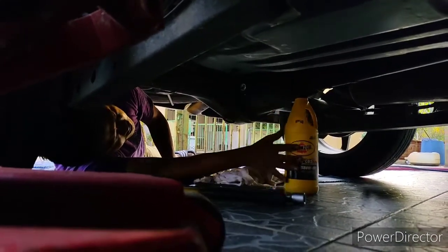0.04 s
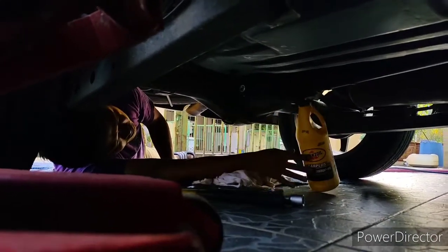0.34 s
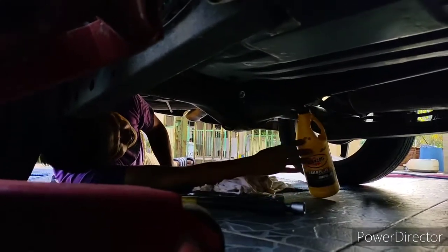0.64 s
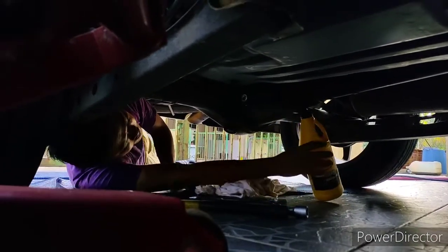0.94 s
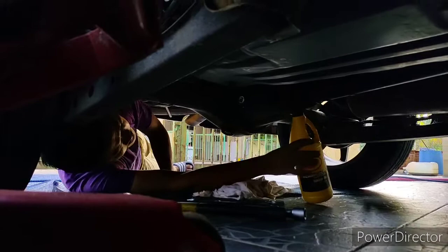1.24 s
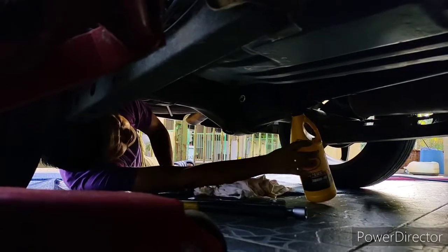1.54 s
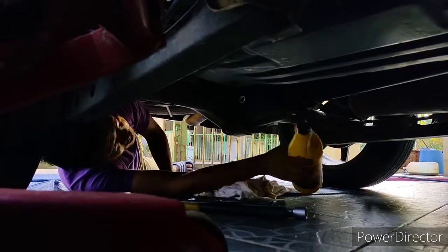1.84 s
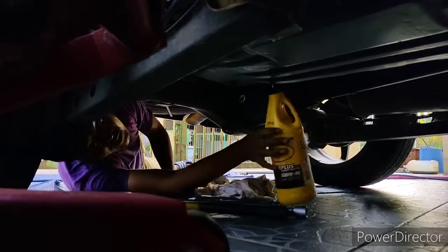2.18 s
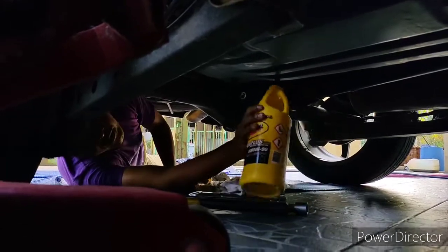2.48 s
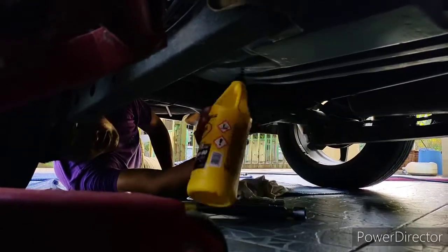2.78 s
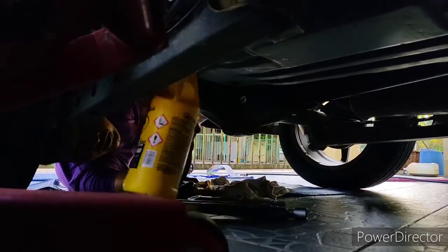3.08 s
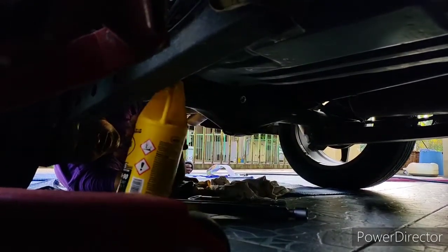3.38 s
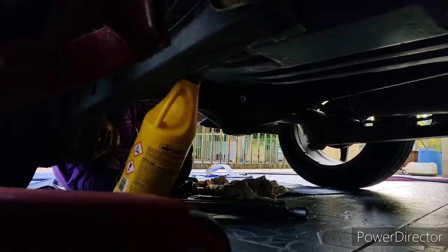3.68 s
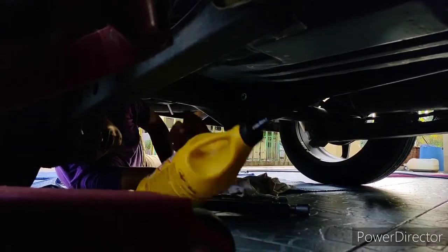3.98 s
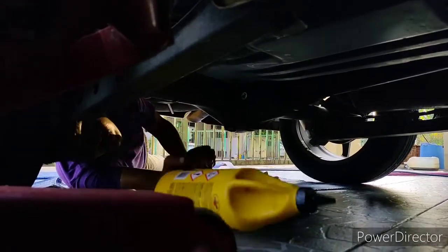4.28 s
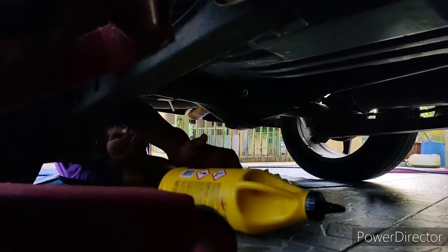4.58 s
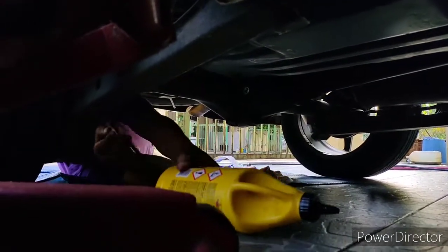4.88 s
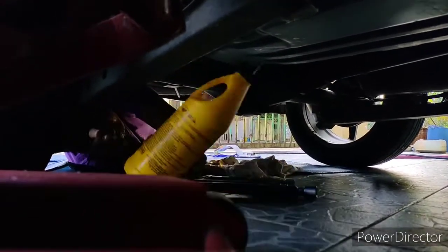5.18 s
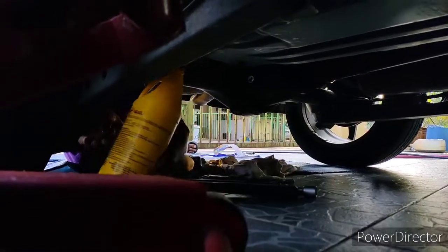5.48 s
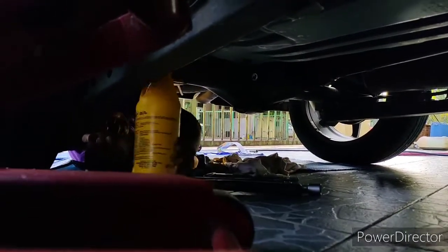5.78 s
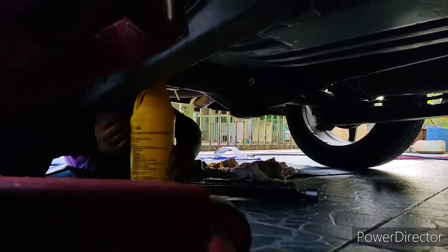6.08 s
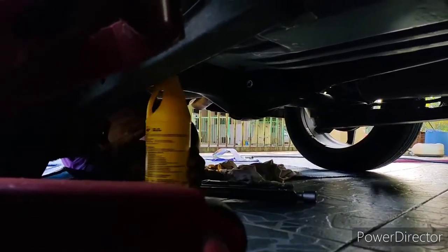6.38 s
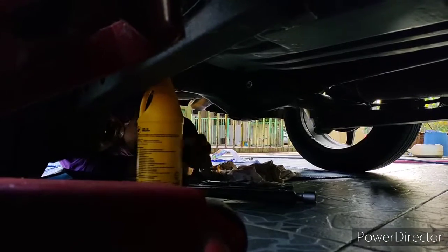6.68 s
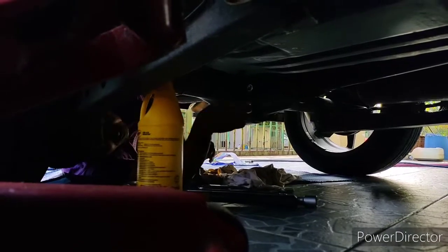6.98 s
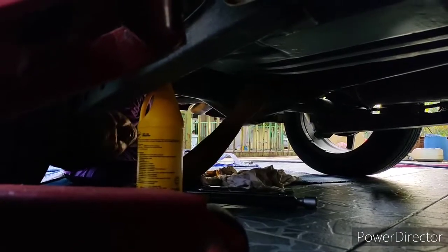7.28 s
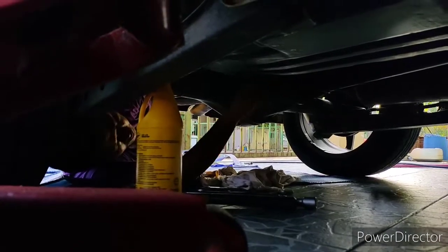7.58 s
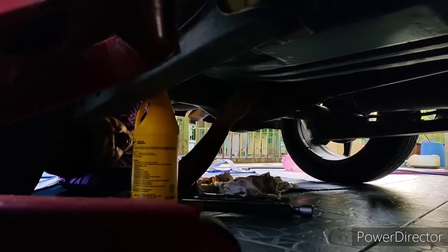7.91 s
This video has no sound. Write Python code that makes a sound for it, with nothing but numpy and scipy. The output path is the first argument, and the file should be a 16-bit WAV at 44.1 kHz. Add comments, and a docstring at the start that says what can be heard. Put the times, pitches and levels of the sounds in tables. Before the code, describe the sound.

Close to the floor of an open-sided garage, a bright tool clink is followed by irregular hollow knocks and scrapes of an empty plastic bottle on tiles. Several bumps against a car's underside give low booms, and a faint distant bird starts chirping. The bottle falls over with a clack and quickening bounces, is set upright firmly and slid along. Soft outdoor hiss and distant rumble continue underneath.

```python
"""Over quiet outdoor air, a steel tool clinks on a tiled garage floor. An empty plastic oil bottle knocks
and scrapes on the tiles, its thin walls ringing, ticking and squeaking as it is handled. It bumps a car's
underbody: the panel booms and a loose metal part rings, while a small bird starts to chirp far off.
The bottle topples, bounces to rest on its side, then is stood up and pushed into place."""
import sys
import numpy as np
from scipy import signal
from scipy.fft import rfft, irfft
from scipy.io import wavfile
from scipy.ndimage import uniform_filter1d

SR = 44100
rng = np.random.default_rng(int(sys.argv[2]) if len(sys.argv) > 2 else 0)


def wrap_up_sound(samples):
    """Save the sound to the file named by the first command line argument, as 16-bit audio."""
    columns = np.atleast_2d(samples).T
    # keep every value between -1 and 1, then stretch to whole-number steps
    tamed = np.clip(columns, -1, 1)
    steps = np.round(tamed * 32767).astype(np.int16)
    wavfile.write(sys.argv[1], SR, steps)


N = 354822


def amp(db):
    """Decibels to gain."""
    return 10 ** (np.asarray(db) / 20)


def rms(x):
    """Root mean square."""
    return np.sqrt(np.mean(x ** 2) + 1e-20)


def curve_at(points, hz):
    """Reads a curve on a log-frequency axis."""
    points_hz, values = np.transpose(points)
    return np.interp(np.log(hz + 1), np.log(points_hz), values)


def add(mix, start, sound):
    """Mixes a sound in at a start time in seconds."""
    part = mix[max(round(start * SR), 0):][:len(sound)]
    part += sound[:len(part)]


def band(x, lo_hz, hi_hz, order=3):
    """Causal band-pass."""
    edges_hz = [lo_hz, min(hi_hz, SR / 2 - 100)]
    return signal.sosfilt(signal.butter(order, edges_hz, "band", fs=SR, output="sos"), x)


def equalise(x, points, size=4096):
    """Minimum-phase EQ through the given (Hz, dB) points."""
    log_gain = np.log(amp(curve_at(points, abs(np.fft.fftfreq(size, 1 / SR)))))
    taps = np.fft.ifft(np.exp(np.conj(signal.hilbert(log_gain)))).real[:size // 2]
    return signal.fftconvolve(x, taps)[:len(x)]


def balance(x, bands, levels_db, seconds):
    """EQs a sound so that its opening seconds come near the given level in each band."""
    gains = [(np.sqrt(lo * hi), db - 20 * np.log10(rms(band(x, lo, hi)[:int(seconds * SR)])))
             for (lo, hi), db in zip(bands, levels_db)]
    return equalise(x, gains)


def dying_noise(count, t60_curve, ring, size=128):
    """Noise whose bands each die at their own speed; ring scales the decay times."""
    hz, t, spectrum = signal.stft(rng.standard_normal(count), SR, nperseg=size)
    t60 = ring * curve_at(t60_curve, hz)[:, None]
    return signal.istft(spectrum * amp(-60 * t / t60), SR, nperseg=size)[1][:count]


def ringing(modes, t, pitch=1, ring=1):
    """Damped sines; each mode starts up or down, by where the blow lands."""
    return sum(rng.choice([-1, 1]) * amp(db - 60 * t / (t60 * ring)) * np.sin(2 * np.pi * hz * pitch * t)
               for hz, db, t60 in modes)


# The tone of the outdoor bed. Each row: frequency in Hz, relative level in dB.
AIR_EQ = [(15, -46), (25, -22.5), (64, 3), (102, -5), (236, -11), (270, -13), (489, -11.5), (575, -16),
          (754, -17), (911, -22.5), (1020, -22.5), (1610, -26.5), (4250, -32), (14800, -48.5), (16000, -45)]
# Two swells of distant rumble. Each row: centre in seconds, half width in seconds, rise in dB.
RUMBLE_SWELLS = [(2.0, 0.56, 5.5), (5.2, 0.3, 10)]


def air(level_db=-51, calm_db=-2, patchy_db=1.66, rumble_hz=130, size=1024):
    """Outdoor hiss drifting in soft patches, over a slowly swelling rumble."""
    frames = dict(fs=SR, nperseg=size, noverlap=size * 3 // 4)
    hz, t, spectrum = signal.stft(rng.standard_normal(N), **frames)
    patches = uniform_filter1d(rng.standard_normal(spectrum.shape), size=10, axis=0)
    patches = uniform_filter1d(patches, size=20, axis=1)
    rumble_db = calm_db + sum(db * np.exp(-((t - centre) / width) ** 2)
                              for centre, width, db in RUMBLE_SWELLS)
    shelf_db = rumble_db / (1 + (hz[:, None] / rumble_hz) ** 4)
    drift = signal.istft(spectrum * amp(patchy_db * patches / rms(patches) + shelf_db), **frames)[1][:N]
    sound = irfft(rfft(drift) * amp(curve_at(AIR_EQ, np.fft.rfftfreq(N, 1 / SR))), N)
    return amp(level_db) * sound / rms(sound)


# The tool's bright ring. Each row: frequency in Hz, level in dB, T60 in seconds before the ring factor.
STEEL_MODES = [(2966, -45, .22), (3333, -38, .1), (3467, -29, .165), (5115, -31, .11), (5165, -37, .14),
               (5539, -51, .22), (6794, -31, .13), (6870, -41, .08), (7461, -29, .12), (7530, -39, .08),
               (8335, -36, .1), (8403, -38, .13), (9318, -41, .13), (9975, -39, .09), (12230, -48, .24),
               (12540, -55, .22), (12890, -50, .26), (13160, -47, .22)]


def clink(ring=1.07, rattle_db=-41, rattle_s=.14):
    """The steel tool rings with beating pairs of modes over a faint rattle on the tile."""
    t = np.arange(SR // 2) / SR
    rattle = band(rng.standard_normal(len(t)), 540, 7000, order=2) * np.exp(-t / rattle_s)
    return ringing(STEEL_MODES, t, ring=ring) + amp(rattle_db) * rattle


# The colour of the bottle's crowd of wall modes. Each row: frequency in Hz, gain in dB.
WALL_EQ = [(100, -29), (300, 2.5), (550, -2.5), (850, 3), (1350, 0), (2000, 4), (3000, 3.5), (4100, 1),
           (4800, -8.5), (7000, -10), (10000, -19), (13000, -22.5), (16000, -44)]
# Their decay. Each row: frequency in Hz, T60 in seconds before the ring factor.
WALL_DECAY = [(200, 0.21), (1000, 0.096), (3500, 0.09), (6000, 0.11), (14000, 0.02)]
# A hit's four bands: hollow, knock, crack, snap. Each row: low edge in Hz, high edge in Hz.
HIT_BANDS = [(130, 500), (500, 1400), (1400, 4500), (4500, 15000)]


def hit(modes, levels_db, pitch, ring, spot_hz, spot_db, wall_db, click_db, crack_db):
    """One blow: a contact click, a short crack, the crowd of wall modes and the main resonances."""
    crack_s, swell_s, spot_t60, scatter = .0033, .00081, .049, .0315
    t = np.arange(SR // 2) / SR
    wall = dying_noise(len(t), WALL_DECAY, ring) * (1 + amp(crack_db) * np.exp(-t / crack_s))
    wall[0] += amp(click_db)
    # where the wall is hit and held shifts its higher modes a little
    shifted = [(hz * (1 + scatter * rng.standard_normal() * np.clip(hz / 1200 - 1, 0, 1)), db, t60)
               for hz, db, t60 in modes]
    body = ringing(shifted, t, pitch, ring)
    body += ringing([(spot_hz, spot_db, spot_t60)], t)  # the struck spot favours one mode
    body *= 1 - np.exp(-t / swell_s)  # the whole shell takes a moment to move
    return balance(body + amp(wall_db) * equalise(wall, WALL_EQ), HIT_BANDS, levels_db, seconds=.025)


def contact_levels(level_db, hardness, tone_db, soft_hz=814):
    """Band levels of a hit: a softer contact lasts longer and so loses its treble."""
    centres_hz = np.sqrt(np.prod(HIT_BANDS, axis=1))
    cutoff_hz = soft_hz * 2 ** hardness
    return level_db + np.array(tone_db) - 10 * np.log10(1 + (centres_hz / cutoff_hz) ** 4)


# The bottle's voice, struck on its base, before each knock's pitch and ring factors.
# Each row: frequency in Hz, relative level in dB, T60 in seconds.
BOTTLE_BASE_MODES = [(112.4, -8, 0.1), (204.7, -6, 0.13), (255, 3.5, 0.064), (425, -9, .1),
                     (563.4, -13.5, 0.086), (737, -14.5, 0.087), (781, -16, 0.13), (1108, -17.5, 0.12),
                     (1547, -18.5, 0.15), (1930, -10, 0.11), (2450, -16, 0.023), (2658, -8.5, 0.085),
                     (3100, -38, 0.14), (3530, -14, 0.13), (3870, -10, 0.1)]
# A perfectly hard knock: hollow, knock, crack and snap offsets in dB.
HARD_KNOCK_TONE = (-0.14, -2.16, -1.5, -0.91)
# Base and corners on the tiles. Each row: start in seconds, level in dB before tone shaping,
# hardness in octaves, pitch factor, struck spot's mode in Hz, its relative level in dB.
TILE_KNOCKS = [(.03, -36.5, 0, .81, 196, 10), (.2035, -35, 2.4, .85, 1550, 3),
               (.409, -43, 2.5, 0.89, 1520, -7), (.802, -41.5, .25, 0.85, 770, -2),
               (1.127, -41.5, .5, 0.99, 248, 0), (1.187, -31.5, .05, .84, 202, 3),
               (1.2166, -31.5, .7, 0.89, 900, 0), (2.999, -32, 1.35, 0.91, 740, 4),
               (3.396, -30, 1.65, 1.05, 1990, -6), (3.828, -32.5, 0.46, 0.98, 728, 1),
               (5.4869, -21.5, 1.25, 1.01, 1100, 5), (5.552, -32.5, 1.35, .94, 2600, 3),
               (5.807, -43, 1.1, .83, 797, 0), (5.993, -36.5, .2, .92, 810, -5),
               (6.1882, -35, 1.95, 1.04, 694, -9), (6.2163, -25, 1.25, 0.99, 775, 6),
               (6.259, -35.5, 1.05, 0.96, 795, 0)]


def knock(start, level_db, hardness, pitch, spot_hz, spot_db, ring=.85, lowest_hz=105):
    """The base meets the tiles; the grip sets the pitch, and the bottle is too small for deep bass."""
    levels_db = contact_levels(level_db, hardness, HARD_KNOCK_TONE)
    sound = hit(BOTTLE_BASE_MODES, levels_db, pitch, ring, spot_hz, spot_db,
                wall_db=2, click_db=20, crack_db=-14)
    return start, band(sound, lowest_hz, SR / 2, order=2)


# The rubbed bottle's resonances. Each row: frequency in Hz, width in Hz, relative level in dB.
RUBBED_MODES = [(210.5, 29, 0), (281, 56, -10), (580, 47, -17.5), (771, 82, -9.5), (1070, 93, -16),
                (1550, 43, -13.5), (1777, 60, -12), (2150, 35, -12), (2505, 140, -13.5), (3010, 56, -15),
                (3630, 35, -8.5), (5460, 430, -23), (6380, 310, -25.5)]
# Friction's three bands: hollow, rasp, hiss. Each row: low edge in Hz, high edge in Hz.
FRICTION_BANDS = [(130, 500), (500, 4500), (4500, 15000)]


def friction(seconds, levels_db, slips_per_s=1900, spread_db=2.7, hiss=.37, wall_db=-17):
    """Tiny slips over grit, in uneven clumps, shake the bottle's wall and its resonances."""
    rise_s, fall_s, grip_db = .0057, .012, 1.7
    length = max(seconds, .01)
    t = np.arange(int((length + .12) * SR)) / SR
    stroke = np.minimum(t / rise_s, 1) * np.exp(-np.maximum(t - length, 0) / fall_s)
    grip = signal.resample(rng.standard_normal(len(t) // 300), len(t))  # catches and lets go
    slipping = rng.random(len(t)) < slips_per_s / SR
    slips = slipping * amp(spread_db * np.minimum(rng.exponential(1, len(t)), 3))
    drive = stroke * amp(grip_db * grip) * (slips + hiss) * rng.standard_normal(len(t))
    body = sum(amp(db) * signal.lfilter(*signal.iirpeak(hz, hz / width, SR), drive)
               for hz, width, db in RUBBED_MODES)
    return balance(body + amp(wall_db) * equalise(drive, WALL_EQ), FRICTION_BANDS, levels_db, length)


# A neutral slide: hollow, rasp and hiss offsets in dB.
SLIDE_TONE = (-5, 0, -16.5)
# Plastic on tile and metal. Each row: start in seconds, end in seconds, level in dB, brightness in dB.
SLIDES = [(.076, .115, -33.5, 8), (.111, .169, -31.5, 7), (.178, .215, -32, 8), (.236, 0.402, -46.5, -2),
          (.42, .55, -53.5, -6), (1.025, 1.091, -49.5, 11), (1.766, 1.795, -39, 8), (1.797, 1.864, -54, -3),
          (2.151, 2.27, -45, -2), (2.335, 2.499, -43, -3.5), (2.549, 2.615, -53.5, 0),
          (2.734, 2.85, -54, 2), (3.711, 3.83, -52, -13.5), (4.253, 4.301, -45, -1.5),
          (4.849, 4.882, -50.5, 0), (4.989, 5.089, -48.5, 8), (5.603, 5.614, -45, 8),
          (5.642, 5.66, -48.5, -6.5), (5.698, 5.738, -46.5, -4.5), (5.777, 5.797, -48.5, -4),
          (6.304, 6.335, -35.5, 11), (6.34, 6.4, -37.5, -1), (6.394, 6.438, -34.5, 3),
          (6.485, 6.557, -41, 0), (6.58, 6.624, -45, 0.5)]


def slide(start, end, level_db, bright_db, hiss_share=.46):
    """The bottle slides: on an edge it is bright and hissy, on its flank hollow."""
    tilt_db = bright_db * np.array([-1, 0, hiss_share])
    return start, friction(end - start, level_db + np.array(SLIDE_TONE) + tilt_db)


# Small, dry snaps. Each row: start in seconds, peak in dB, frequency in Hz that places the noise band.
PLASTIC_TICKS = [(.148, -24, 2200), (.427, -27.5, 1300), (.484, -37, 1500), (0.8913, -27.5, 3130),
                 (.9255, -31, 3100), (2.175, -26.5, 1700), (2.47, -28, 3340), (2.486, -34, 5460),
                 (3.7, -38, 1700), (3.758, -39.5, 3500), (4.219, -31, 2600), (4.277, -32, 2770),
                 (4.3, -28, 3680), (5.053, -35, 3000), (6.398, -26, 2710)]


def tick(start, peak_db, hz, snap_s=.0017, ring_s=.022, ring_db=-15):
    """Plastic or grit snaps, leaving a faint ring of the wall."""
    t = np.arange(SR // 20) / SR
    envelope = np.exp(-t / snap_s) + amp(ring_db) * np.exp(-t / ring_s)
    sound = band(rng.standard_normal(len(t)) * envelope, hz * .42, hz * 1.24, order=2)
    return start, amp(peak_db) * sound / abs(sound).max()


# Low, bending notes. Each row: start and length in seconds, first and last pitch in Hz, level in dB.
ROCKING_GLIDES = [(.208, .06, 206, 198, -33), (.46, .15, 204.4, 199, -39), (1.238, 0.079, 173, 158, -32.5),
                  (4.178, .045, 254, 258, -21), (4.21, .12, 268, 322, -44), (4.455, 0.084, 335, 283, -33.5),
                  (4.425, .09, 214, 120, -40), (5.487, 0.053, 558, 550, -29), (6.218, .12, 123.6, 108, -37)]


def rocking(start, length, first_hz, last_hz, level_db, crest_share=.2):
    """One mode of the bottle swells, glides and fades, as the load on its flank shifts or as the fall's low
    ring lingers."""
    progress = np.linspace(0, 1, int(length * SR))
    hz = first_hz + (last_hz - first_hz) * progress
    tone = np.sqrt(2) * np.sin(2 * np.pi * np.cumsum(hz) / SR)
    envelope = progress / crest_share * np.exp(1 - progress / crest_share) * np.sqrt(1 - progress)
    return start, amp(level_db) * tone * envelope


# An airy brush: hollow, rasp and hiss offsets in dB.
SLEEVE_TONE = (-4, 0, 0)
# Hand and sleeve passing. Each row: start in seconds, end in seconds, level in dB.
SLEEVE_BRUSHES = [(.895, 1.073, -56), (3.131, 3.25, -63.5), (3.569, 3.7, -66.5), (4.429, 4.527, -57.5),
                  (7.263, 7.334, -68), (7.5, 8.047, -71.5)]


def brush(start, end, level_db):
    """Skin or cloth slides with a soft hiss."""
    return start, friction(end - start, level_db + np.array(SLEEVE_TONE))


# Hoarse squeaks. Each row: start in seconds, length in seconds, pitch in Hz, level in dB.
PLASTIC_SQUEAKS = [(1.049, .022, 3250, -43), (1.764, .038, 3770, -38.5), (2.808, .041, 1850, -52),
                   (6.312, 0.027, 2940, -36), (6.396, .041, 3740, -42)]


def squeak(start, length, hz, level_db, width=.066):
    """The plastic catches: fast stick and slip excites one narrow band of the wall."""
    count = int(max(length, .005) * SR)
    noise = rng.standard_normal(count + 1000)  # extra samples let the filter settle
    sound = band(noise, hz * (1 - width), hz * (1 + width), order=2)[-count:]
    return start, amp(level_db) * sound / rms(sound) * np.sin(np.linspace(0, np.pi, count))


# The car's panel. Each row: frequency in Hz, relative level in dB, T60 in seconds before the ring factor.
UNDERBODY_MODES = [(68, -9, 0.52), (82.3, -12, .35), (111, -4, 0.14), (159.4, -3, 0.26), (215.7, 2.5, 0.12),
                   (255.4, -7.5, 0.32), (327, -13, 0.29), (620, -10, 0.059), (820, -12, 0.064),
                   (1225, -19, 0.086), (1408, -13, 0.19), (1566, -14, 0.18), (1841, -8, 0.089),
                   (2320, -9.5, 0.11), (3100, -22, .08), (3770, -23, .13), (3900, -29, .3)]
# A perfectly hard bump: hollow, knock, crack and snap offsets in dB.
HARD_BUMP_TONE = (-0.5, -6, -0.5, -1)
# Thuds under the car. Each row: start in seconds, level in dB before tone shaping,
# hardness in octaves, ring factor, struck spot's mode in Hz.
UNDERBODY_BUMPS = [(2.1195, -29, 1.85, 2.8, 1900), (2.139, -35, 1.6, 1.9, 1740),
                   (2.3215, -30.5, 1.12, 1.4, 242), (2.382, -27, 0.51, .65, 590),
                   (2.409, -41, 1.9, .64, 2910), (2.47, -34, 1.6, 1.3, 867), (2.539, -44.5, 1.2, 2, 1250),
                   (2.866, -30.5, 1.7, 1.15, 2600)]


def bump(start, level_db, hardness, ring, spot_hz):
    """The bottle hits the underbody panel, damping it more or less."""
    levels_db = contact_levels(level_db, hardness, HARD_BUMP_TONE)
    return start, hit(UNDERBODY_MODES, levels_db, pitch=1, ring=ring, spot_hz=spot_hz, spot_db=4,
                      wall_db=4, click_db=15, crack_db=5)


# The panel's deep, drooping booms. Each row: start in seconds, opening pitch in Hz, opening level in dB.
UNDERBODY_BOOMS = [(2.19, 112, -27), (2.322, 169, -25), (2.866, 135, -29.5)]


def boom(start, first_hz, level_db, rest_hz=64.8, sag_s=.0278, drop_db=9, t60=.9, ramp_s=.0043):
    """After a bump, the car's underbody panel booms: a low note sags in pitch and fades."""
    t = np.arange(int(.3 * SR)) / SR
    sag = np.exp(-t / sag_s)
    hz = rest_hz + (first_hz - rest_hz) * sag
    tone = np.sqrt(2) * np.sin(2 * np.pi * np.cumsum(hz) / SR)
    envelope = amp(level_db - drop_db * (1 - sag) - 60 * t / t60)
    ramps = np.minimum(np.minimum(t, t[-1] - t) / ramp_s, 1)
    return start, tone * envelope * ramps


# A thin metal shimmer. Each row: frequency in Hz, level in dB, T60 in seconds.
LOOSE_METAL_MODES = [(5860, -57, 0.35), (6300, -61, .35), (8680, -60, .55), (9500, -69, 0.34),
                     (11800, -70, 0.99)]


def loose_metal(flutter_db=3, flutter_points=60):
    """A loose part under the car rings on after a bump, fluttering as it rattles on its seat."""
    t = np.arange(SR // 2) / SR
    sound = np.zeros(len(t))
    for mode in LOOSE_METAL_MODES:
        tone = ringing([mode], t)
        flutter = signal.resample(rng.standard_normal(flutter_points), len(t))
        sound += tone * amp(flutter_db * flutter)
    return sound


# The distant bird's clear notes. Each row: start in seconds, peak in dB.
BIRD_CHIRPS = [(2.441, -57), (2.9, -61), (3.2, -58), (3.891, -64), (3.991, -57), (6.01, -61)]


def chirp(start, peak_db, hz=4670, length_s=.039, arch_hz=40, waver_hz=300):
    """The bird sings a thin, slightly arched and wavering note."""
    arch = np.sin(np.linspace(0, np.pi, int(length_s * SR)))
    waver = uniform_filter1d(rng.standard_normal(len(arch)), size=80)
    pitch_hz = hz + arch_hz * (arch - .8) + waver_hz * waver
    return start, amp(peak_db) * arch * np.sin(2 * np.pi * np.cumsum(pitch_hz) / SR)


def twitter(count=7, from_s=2.55, to_s=5.4, peak_db=-66):
    """Cues for faint chirps at random times among the clear ones."""
    return [(start, peak_db) for start in rng.uniform(from_s, to_s, count)]


# The bottle's voice, struck on its side, before each landing's pitch and ring factors.
# Each row: frequency in Hz, relative level in dB, T60 in seconds.
BOTTLE_SIDE_MODES = [(182, -13, 0.21), (267, -4, 0.087), (360.2, -1, 0.15), (415, -12, 0.1),
                     (772, -8.5, 0.098), (829, -1.5, 0.081), (1116, -22, 0.087), (1490, -22, 0.051),
                     (1765, -7.5, 0.073), (2190, -13, 0.054), (2750, -8, 0.065), (3700, -9, 0.08),
                     (4186, -14, .065), (4380, -11, 0.05)]
# The fall. One row: start in seconds, hollow, knock, crack and snap levels in dB, pitch factor,
# ring factor, struck spot's mode in Hz, its relative level in dB.
TOPPLE = (4.1756, -27, -25, -28, -28.3, 1.08, .75, 1000, -3)


def side_landing(row):
    """The bottle lands on its flank with a hollow clack."""
    start, *levels_db, pitch, ring, spot_hz, spot_db = row
    return start, hit(BOTTLE_SIDE_MODES, levels_db, pitch, ring, spot_hz, spot_db,
                      wall_db=1, click_db=18.5, crack_db=-1)


# The first bounce: hollow, knock, crack and snap levels in dB.
FIRST_BOUNCE_DB = (-27.5, -29.5, -31, -30.5)
# What each further bounce loses: hollow, knock, crack and snap in dB.
LOSS_PER_BOUNCE_DB = (1.77, 3.4, 1.95, 5.26)


def bounce(number, first_s=4.3937, flight_s=.1468, restitution=.715, ring=.8, spot_hz=2950):
    """Each bounce comes sooner, weaker and duller than the last; one wall mode stands out ever more."""
    start = first_s + flight_s * (1 - restitution ** number) / (1 - restitution)
    levels_db = np.array(FIRST_BOUNCE_DB) - number * np.array(LOSS_PER_BOUNCE_DB)
    pitch = 1 + .0094 * (number - 2)
    spot_db = -9 + 2 * number
    return side_landing((start, *levels_db, pitch, ring, spot_hz, spot_db))


# The room's tail. Each row: frequency in Hz, T60 in seconds before the ring factor.
GARAGE_DECAY = [(100, 0.57), (500, 0.37), (2000, .4), (4000, 0.43), (8000, 0.21), (15000, 0.38)]


def garage(x, wet_db=-15, build_s=.005):
    """The open-sided garage returns a short, weak tail."""
    t = np.arange(SR // 2) / SR
    tail = dying_noise(len(t), GARAGE_DECAY, ring=.83) * (1 - np.exp(-t / build_s))
    return x + amp(wet_db) * signal.fftconvolve(x, tail / np.linalg.norm(tail))[:N]


def scene():
    """Tool, bottle and bird through the garage's reverb, over the outdoor air."""
    mix = np.zeros(N)
    add(mix, 0, clink())
    add(mix, 2.322, loose_metal())  # lands with the third bump
    add(mix, *side_landing(TOPPLE))
    bounces = [(number,) for number in range(7)]
    layers = [(knock, TILE_KNOCKS), (bounce, bounces), (bump, UNDERBODY_BUMPS), (slide, SLIDES),
              (brush, SLEEVE_BRUSHES), (tick, PLASTIC_TICKS), (squeak, PLASTIC_SQUEAKS),
              (rocking, ROCKING_GLIDES), (boom, UNDERBODY_BOOMS), (chirp, BIRD_CHIRPS + twitter())]
    for source, cues in layers:
        for cue in cues:
            add(mix, *source(*cue))
    return (garage(mix) + air())[None]


def record(dry, low_cut_hz=36, high_cut_hz=15600):
    """The microphone's bass roll-off, then a steep cut of the highest treble."""
    thinned = signal.sosfilt(signal.butter(2, low_cut_hz, "high", fs=SR, output="sos"), dry)
    low_pass = signal.firwin(511, high_cut_hz, window=("kaiser", 9), fs=SR)
    return signal.oaconvolve(thinned, low_pass[None], "same")


dry = scene()
out = record(dry)
wrap_up_sound(out)
```